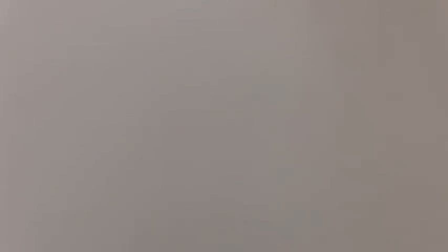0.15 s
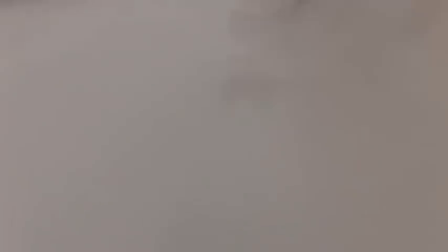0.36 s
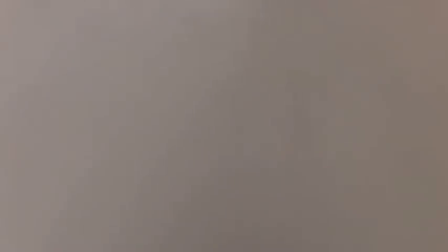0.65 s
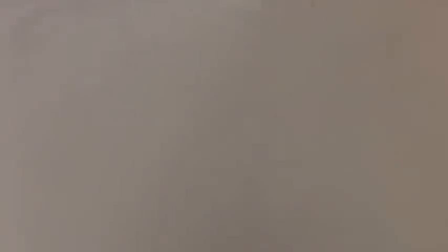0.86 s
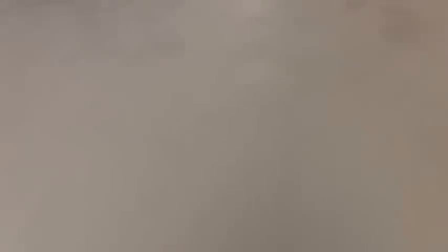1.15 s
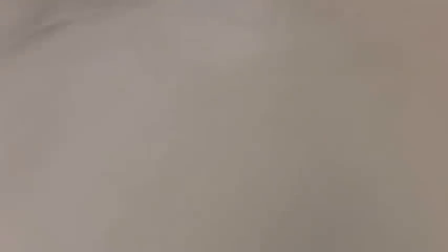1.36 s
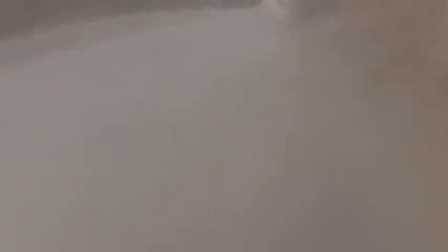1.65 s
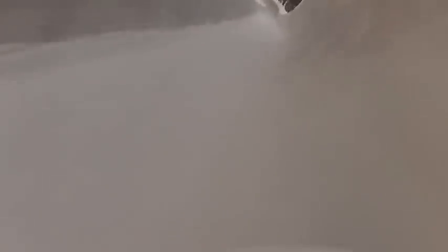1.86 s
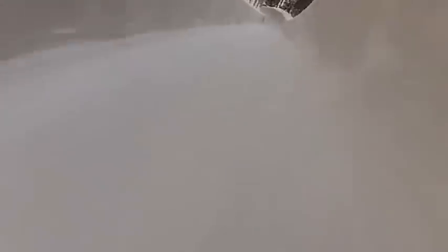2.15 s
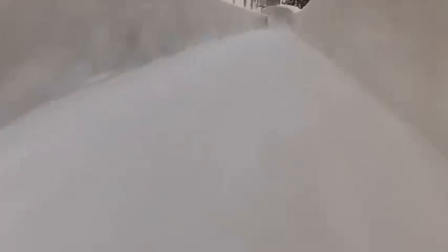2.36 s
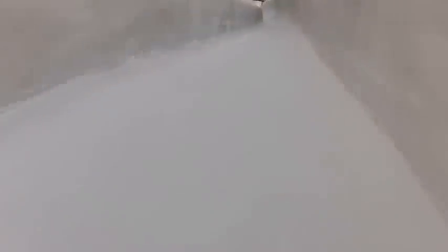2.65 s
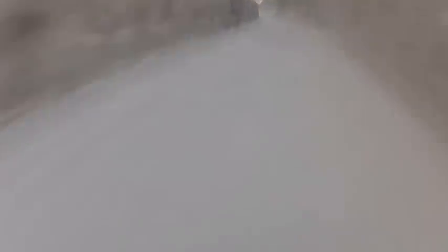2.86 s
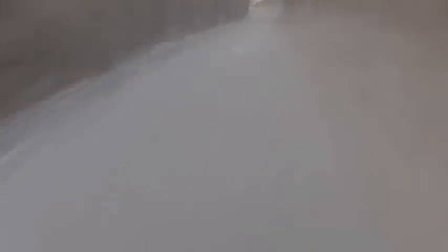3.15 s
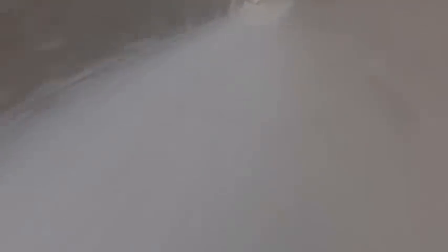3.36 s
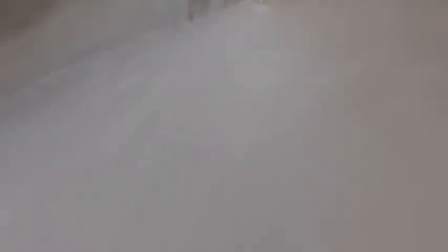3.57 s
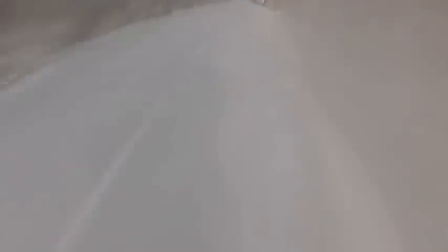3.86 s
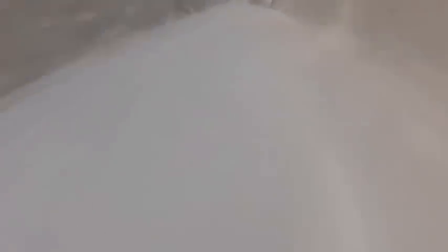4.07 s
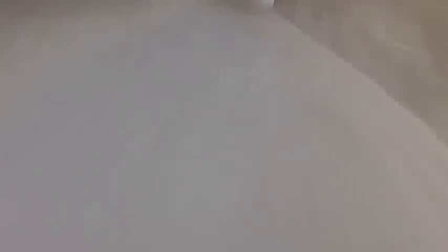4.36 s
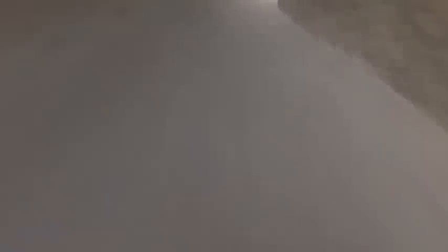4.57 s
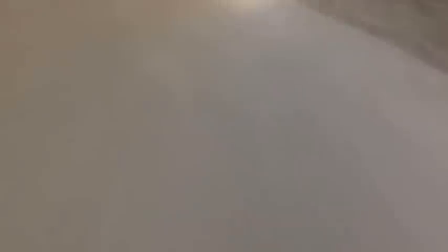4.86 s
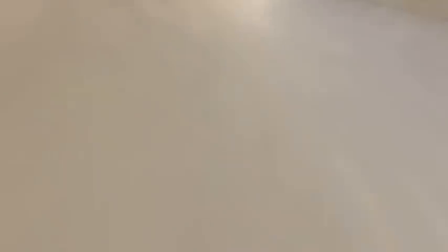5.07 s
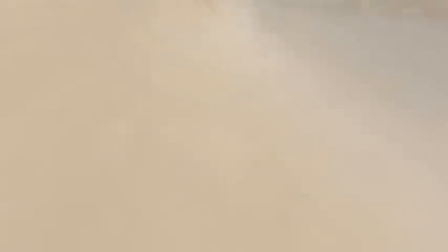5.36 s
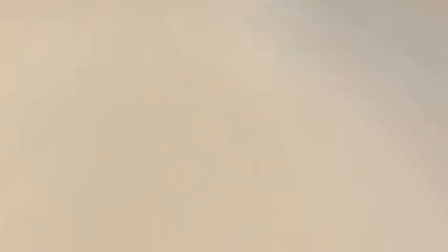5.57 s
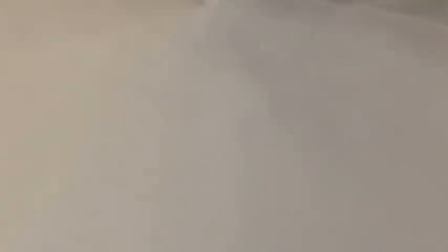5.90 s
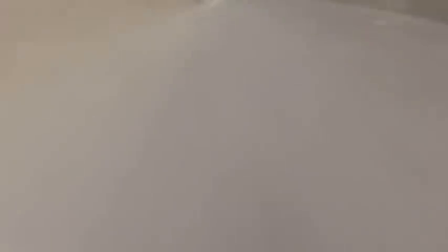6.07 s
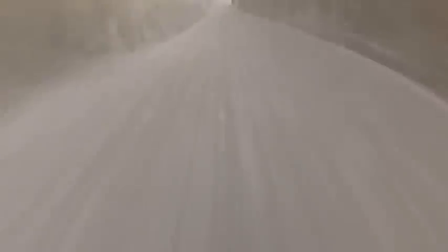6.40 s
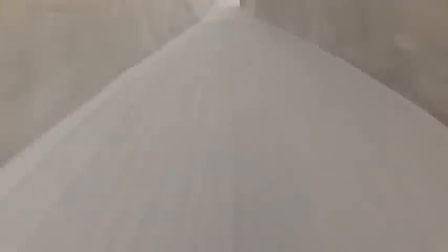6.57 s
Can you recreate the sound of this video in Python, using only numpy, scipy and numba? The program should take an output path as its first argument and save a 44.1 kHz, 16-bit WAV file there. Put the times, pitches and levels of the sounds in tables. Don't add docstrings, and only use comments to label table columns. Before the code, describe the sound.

An onboard ride down an ice run: an unbroken coarse scrape of metal on ice over a shuddering bass rumble. Dull slams and booming bumps strike irregularly early on, ease through the middle, and return thickly near the end. In the banked turns the frame groans low. The sound is carried through the mount, without room or distance, squashed by late gain control, with gritty, mirrored treble.

```python
import sys
import numpy as np
from scipy import signal
from scipy.io import wavfile
from scipy.ndimage import uniform_filter1d
from numba import njit

SR = 44100
rng = np.random.default_rng(int(sys.argv[2]) if len(sys.argv) > 2 else 0)


def pcm_store(signal):
    levels = np.round(np.clip(np.atleast_2d(signal), -1, 1) * 32767)
    wavfile.write(sys.argv[1], SR, levels.astype(np.int16).T)


def natural_amplitude(level_db):
    exponent = np.asarray(level_db, float) / 20
    return 10 ** exponent


N = 297234

MOUNT_HZ, MOUNT_WIDTH_HZ = 96.5, 22

# (slam time [s], slam strength [dB], drop comes this long before [ms], drop strength [dB])
RIDGE_SLAMS = [(-0.0019, 1.5, 17, -8), (0.528, 5.5, 26, 5), (1.032, 3, 11.5, -3), (1.1215, -3, 12, -25),
               (1.6816, -4, 15, -5), (1.784, 0, 19, 2), (5.551, 3.5, 15, -5), (5.6456, 2.5, 14.7, 6),
               (5.9404, -1, 13, -13), (6.1762, 2, 17.6, -1), (6.4229, 4.5, 9.6, -4)]


def level(x, db):
    return x * natural_amplitude(db) / np.sqrt(np.mean(x ** 2))


def ring(x, hz, width_hz):
    return signal.lfilter(*signal.iirpeak(hz, hz / width_hz, fs=SR), x)


def noise():
    return rng.standard_normal(N)


def walk(rate):
    hold = int(SR / rate)
    steps = np.repeat(rng.standard_normal(N // hold + 1), hold)[:N]
    slewed = uniform_filter1d(uniform_filter1d(steps, hold), hold)
    return level(slewed, 0)


def body(x):
    # (frequency [Hz], width [Hz], level [dB])
    modes = [(364.6, 101, -8.5), (908.5, 60, -8.5), (1274, 183, -4), (1836, 335, -2.5), (2254, 270, -0.5),
             (2767, 276, -5.5), (3082, 166, -4.5), (3710, 456, -10), (4520, 210, -12), (5725, 790, -14)]
    return sum((-1) ** k * natural_amplitude(db) * ring(x, hz, width) for k, (hz, width, db) in enumerate(modes))


def scrape(scrape_db):
    grains_per_s, grain_spread_db, hiss_db = 5000, 1.5, 6
    arrival, size, side = rng.random((N, 3)).T
    size_db = -grain_spread_db * np.log(1 - size)
    grains = (arrival < grains_per_s / SR) * natural_amplitude(size_db) * np.sign(side - .5)
    contact = level(grains, 0) + level(noise(), hiss_db)
    chatter_db = 0.16 * walk(8.2) + 0.57 * walk(35) + 0.23 * walk(140)
    return level(body(contact * natural_amplitude(chatter_db)), 0) * natural_amplitude(scrape_db + 1.5)


def rebound(t):
    rebound_db, rebound_s = -1, 0.042
    unload_db = np.zeros(len(t))
    for s, db, _, _ in RIDGE_SLAMS:
        age = np.maximum(t - s, 0) / rebound_s
        unload_db += rebound_db * natural_amplitude(db) * age * np.exp(1 - age)
    return unload_db


def blows():
    slam_ms, drop_ms = 3.15, 9.2
    # (time [s], strength [dB], push time [ms])
    humps = [(0.491, -1, 11), (1.1339, -1, 7), (1.22, 0.5, 14.5), (1.308, 6, 15.4), (1.3864, 3, 12.6),
             (1.403, -1, 9.5), (1.7156, 0, 10), (1.835, -9, 7.6), (2.0247, -11, 7.5), (2.144, -2, 15),
             (2.3872, -13, 7.9), (2.9942, -13, 6.7), (3.408, -13, 4.4), (3.7845, -17, 4.5),
             (3.9232, -1.5, 9.9), (4.212, -10, 4.6), (4.6302, -15, 4.2), (5.184, -1, 12),
             (5.1992, 0.5, 5.6), (5.2235, 1, 11), (5.493, -6, 8.2), (5.611, -7, 5), (5.711, 4, 15),
             (5.7585, -3, 7.8), (5.833, -9, 22), (5.921, -7, 6.5), (6.29, -7.5, 12), (6.388, -8, 3.8),
             (6.449, -7, 6.5)]
    # (time [s], strength [dB], push time [ms])
    hollows = [(1.432, 10, 20), (2.085, 2, 15), (0.849, -15, 4.1), (4.3538, -13, 4.6), (4.521, -6, 10.5),
               (4.9836, 0.5, 13), (5.209, -3, 3.9), (5.2315, -10, 6.7), (5.6171, 10, 7.5), (5.7274, -3, 13),
               (5.957, -10, 2.3), (6.211, -13, 2.8), (6.396, 8.5, 10.7), (6.528, -14, 7.3)]
    slams = [(s, db, slam_ms, 1) for s, db, _, _ in RIDGE_SLAMS]
    drops = [(s - ms / 1000, db, drop_ms, -1) for s, _, ms, db in RIDGE_SLAMS]
    return slams + drops + [(*row, 1) for row in humps] + [(*row, -1) for row in hollows]


def mount(push):
    spring = [1, 2 * np.pi * MOUNT_WIDTH_HZ, (2 * np.pi * MOUNT_HZ) ** 2]
    return signal.lfilter(*signal.bilinear([1, 0, 0], spring, SR), push)


def housing(swing):
    mode_hz, width_hz = 355, 64
    w = 2 * np.pi * mode_hz
    return signal.lfilter(*signal.bilinear([w * w], [1, 2 * np.pi * width_hz, w * w], SR), swing)


def jolts():
    crack_db, crack_s = 26, 0.0017
    lead = 2048
    t = np.arange(-lead, N) / SR
    push, crack = np.zeros(len(t)), np.zeros(len(t))
    for s, db, ms, direction in blows():
        span = slice(*np.searchsorted(t, [s, s + .1]))
        age = t[span] - s
        push_age = age / ms * 1000
        push[span] += np.sign(direction) * natural_amplitude(db) * (push_age * np.exp(1 - push_age)) ** 2
        crack_age = (age / crack_s) ** 2
        crack[span] += (direction > 0) * natural_amplitude(db) / ms ** 0.96 * crack_age * np.exp(-crack_age)
    swing = housing(mount(push))
    knock = ring(ring(noise() * crack[lead:], 1330, 320), 1700, 1100)
    return swing[lead:] + natural_amplitude(crack_db) * knock


def rumble(bump_db, heave_db):
    uneven = walk(11)
    ripples = signal.lfilter(*signal.butter(3, 105, fs=SR), noise()) * natural_amplitude(0.69 * uneven)
    swing = ring(ripples, MOUNT_HZ, MOUNT_WIDTH_HZ)
    heave = ring(ring(noise(), 42, 88), 33, 132) * natural_amplitude(1.4 * uneven + 1.8 * walk(6.3))
    return level(swing, -2.5) * natural_amplitude(bump_db) + level(heave, 5.6) * natural_amplitude(heave_db)


def banking(t):
    ease_s = .2
    # (enters [s], leaves [s])
    turns = [
        (-.3, 1.33),
        (4.65, 6.35),
    ]
    return sum(np.clip(np.minimum(t - enter, leave - t) / ease_s, 0, 1) for enter, leave in turns)


def groan(bank):
    groan_db, turn_db = -38.5, 7
    high = ring(ring(noise(), 560, 400), 540, 450) * natural_amplitude(-12.5 + turn_db * bank)
    low = ring(ring(noise(), 223, 110), 227, 140) * natural_amplitude(1.2 * bank)
    return level((low + high) * natural_amplitude(2.0 * walk(8)), groan_db)


def scene():
    ripple_db, heave_base_db, turn_heave_db = 1, -36, 5
    heave_follows = .7
    # (time [s], runner pressure as scrape level [dB], bumpiness of the ice [dB])
    ride = [(0, -20.5, -27), (.2, -20, -34), (.7, -19, -30), (1.3, -18, -29.5), (1.9, -17.5, -24.5),
            (2.3, -18.5, -26), (2.5, -20, -30), (2.78, -16.5, -27.5), (2.95, -18, -28.5),
            (3.77, -17, -26.5), (4.4, -18, -27.5), (4.9, -19, -27.5), (5.3, -18.5, -32.5),
            (5.72, -17, -23.5), (5.97, -19, -26), (6.12, -16, -30), (6.3, -19, -21), (6.74, -17, -29)]
    t = np.arange(N) / SR
    s, *columns = np.transpose(ride)
    scrape_db, bump_db = (np.interp(t, s, column) for column in columns)
    bank = banking(t)
    heave_db = heave_base_db + heave_follows * (bump_db - bump_db.mean()) + turn_heave_db * bank
    sled = scrape(scrape_db + rebound(t)) + jolts() + rumble(bump_db + ripple_db, heave_db) + groan(bank)
    return np.tile(sled, (2, 1))


@njit
def follow(x, start, attack, release):
    out, e = np.empty(len(x)), start
    for i in range(len(x)):
        e += (abs(x[i]) - e) * (attack if abs(x[i]) > e else release)
        out[i] = e
    return out


def duck(x):
    ratio, top, lag_s = 5, 0.82, .006
    attack_s, release_s = 0.00065, 0.085
    peak = follow(x, 2.05, 1 / (attack_s * SR), 1 / (release_s * SR))
    peak = np.interp(np.arange(N) - lag_s * SR, np.arange(N), peak)
    return x * np.minimum(1, top / peak) ** (1 - 1 / ratio)


def hold_samples(x):
    hold_hz, hold_count = 12000, 4
    anti_alias_hz, top_hz = 5720, 15270
    smooth = signal.sosfiltfilt(signal.butter(14, anti_alias_hz, fs=SR, output="sos"), x)
    samples = np.clip(signal.resample_poly(smooth, 40, 147), -1, 1)
    steps = np.repeat(samples, hold_count)
    output_filter = signal.ellip(10, .1, 45, top_hz, fs=hold_hz * hold_count, output="sos")
    steps = signal.sosfiltfilt(output_filter, steps)
    return np.clip(signal.resample_poly(steps, 147, 160)[:N], -1, 1)


def thin_and_part(x):
    drop_base_db, drop_wobble_db, drop_6k_db = -84.5, .5, 1.5
    apart_db, apart_bass_db = -12.5, -24.5
    # (frequency [Hz], share of tiles [0-1])
    apart_share = [(0, 0.2), (1200, 0), (4000, .01), (5300, 0.2), (5900, .5), (7200, 0.2), (7700, 0),
                   (15000, 0.03)]
    frame = dict(fs=SR, window="cosine", nperseg=2048, noverlap=1024, scaling="psd")
    hz, _, z = signal.stft(x, **frame)
    power = uniform_filter1d(np.abs(z) ** 2, size=12, axis=0)
    drop_db = drop_base_db + drop_wobble_db * rng.standard_normal(z.shape[1])
    drop_db = drop_db + drop_6k_db * (hz < 8000)[:, None]
    z = z * ((power > natural_amplitude(2 * drop_db)) | (hz < 4000)[:, None])
    tile_hz = hz[::16]
    draw = rng.random((len(tile_hz), z.shape[1]))
    draw = .5 * draw + .5 * uniform_filter1d(draw[0], size=2)
    share = np.clip(np.interp(tile_hz, *np.transpose(apart_share)), 0, 1)
    apart = draw < np.quantile(draw, share)[:, None]
    size_db = np.where(tile_hz < 4000, apart_bass_db, apart_db)[:, None]
    size_db = size_db + 2.2 * rng.standard_normal(draw.shape)
    size = np.repeat(apart * natural_amplitude(size_db), 16, axis=0)[:len(hz)]
    rounding = size * np.abs(z) * np.exp(2j * np.pi * rng.random(z.shape))
    return np.array([signal.istft(z + sign * rounding, **frame)[1][:N] for sign in (1, -1)])


def band_limit(x):
    return signal.sosfilt(signal.butter(12, 16300, fs=SR, output="sos"), x)


def record(dry):
    held = hold_samples(duck(dry[0]))
    mix = np.clip(thin_and_part(held), -1, 1)
    return band_limit(mix)


dry = scene()
out = record(dry)
pcm_store(out)
```